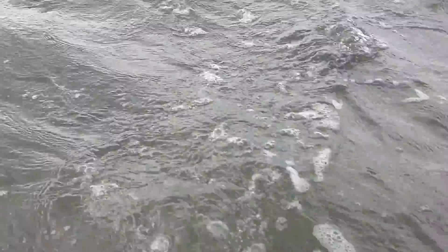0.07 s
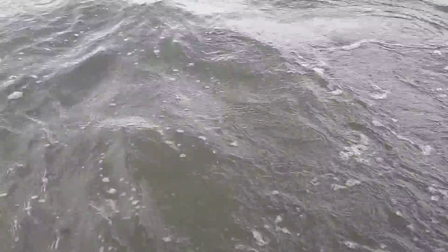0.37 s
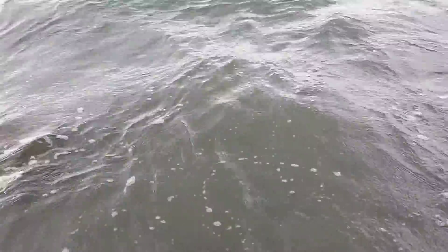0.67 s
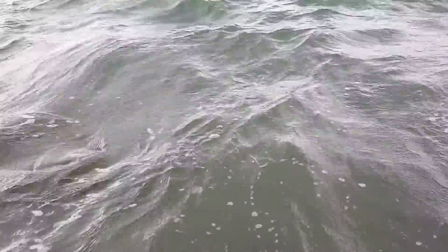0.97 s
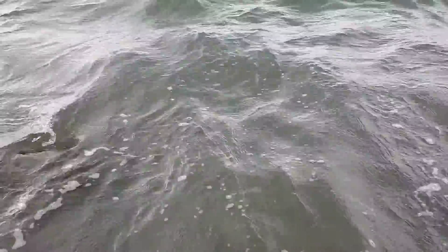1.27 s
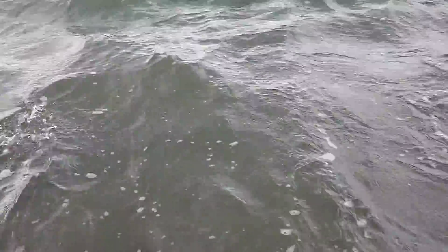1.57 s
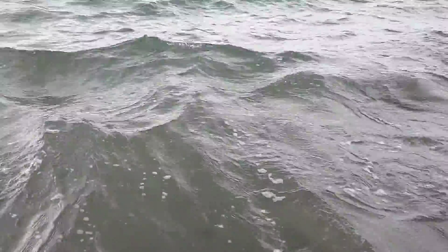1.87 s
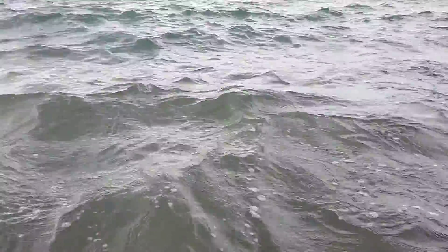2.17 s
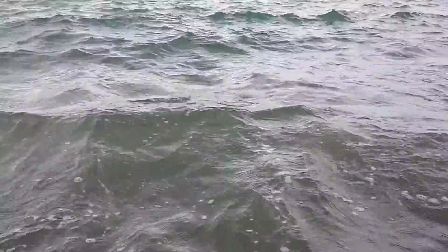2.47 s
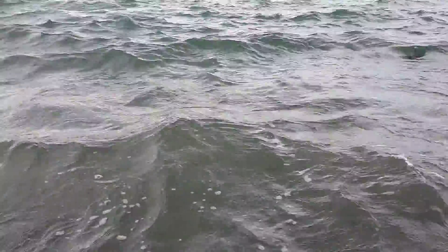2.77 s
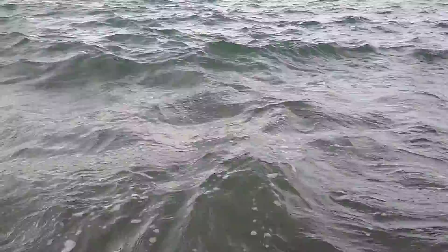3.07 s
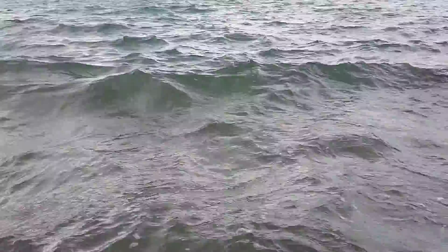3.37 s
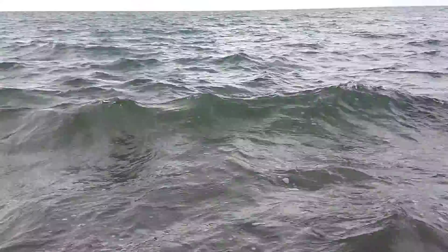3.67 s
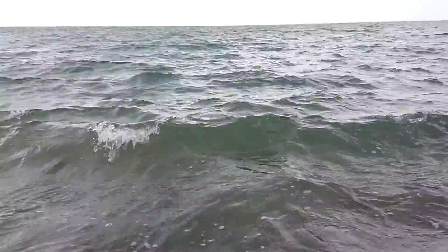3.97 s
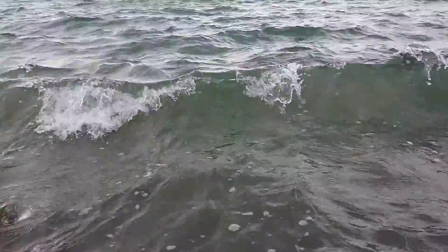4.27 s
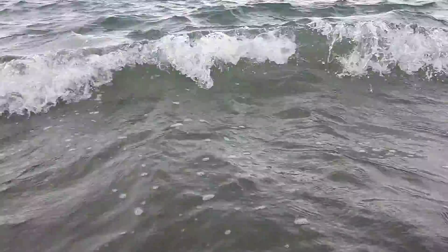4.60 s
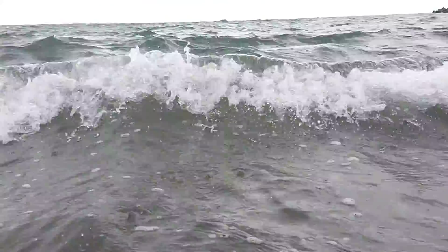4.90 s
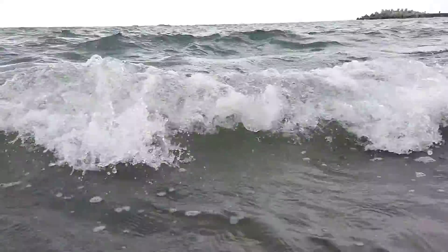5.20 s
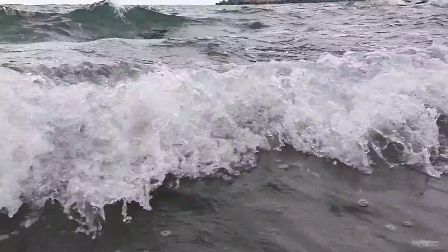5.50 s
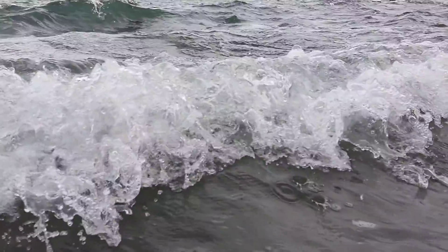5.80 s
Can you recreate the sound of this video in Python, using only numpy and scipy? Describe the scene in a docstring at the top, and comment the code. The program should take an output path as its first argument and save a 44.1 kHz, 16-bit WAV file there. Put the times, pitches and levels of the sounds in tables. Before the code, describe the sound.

Close waves wash out, ease into gentle lapping with small plops, then spill into loud foamy surf, with gusts of wind rumbling throughout.

```python
"""Shallow sea at the foot of a seawall, heard at two spaced microphone ports. First a wave washes out:
countless bubbles ring, foam hisses through a small resonant cavity at the right port, drops slap the
surface, and wind buffets each port on its own. From about 1 s the water laps and single bubbles plop.
After 4 s the next crest spills into foam, and at 5.6 s the sound stops dead in mid-break."""
import sys
import numpy as np
from scipy import signal
from scipy.fft import rfft, irfft, next_fast_len
from scipy.io import wavfile
from scipy.ndimage import uniform_filter1d

SR = 44100
rng = np.random.default_rng(int(sys.argv[2]) if len(sys.argv) > 2 else 0)


def int16_out(signal):
    """Quantize to a 16-bit WAV file."""
    q = np.round(np.clip(np.atleast_2d(signal).T, -1, 1) * 32767)
    wavfile.write(sys.argv[1], SR, q.astype(np.int16))


N = 266584

# Levels in the tables are relative: each source adds its own gain.
# agitation of the water: t/s, churning body level/dB, fine spray level/dB
SURF_LEVELS = [(0.0, -29.5, -39.5), (0.06, -35, -47), (0.09, -31.5, -41.5), (0.2, -36.5, -52),
               (0.23, -35.5, -50), (0.9, -41.5, -57.5), (1.06, -40, -56), (2.73, -44, -61),
               (3.45, -44.5, -61.5), (4.15, -41.5, -58), (4.49, -40, -51), (4.52, -36.5, -48.5),
               (4.86, -32.5, -45), (4.99, -28.5, -41), (5.0, -32, -43), (5.58, -29, -43)]
# response of each port to the water: f/Hz, level/dB
LEFT_RESPONSE = [(60, -4), (150, 3.5), (330, 5), (650, 4), (1300, -1), (1950, -5), (2500, -7),
                 (4200, -10.5), (5200, -14), (6200, -16), (8200, -26.5), (10000, -16.5), (12000, -14.5),
                 (15500, -20.5)]
RIGHT_RESPONSE = [(60, -10.5), (150, 1), (330, 5.5), (620, 7), (1300, 1), (1950, 0), (2900, -0.5),
                  (4000, -7), (5200, -25.5), (6500, -18.5), (8200, -31.5), (10000, -14.5), (11400, -9),
                  (15500, -23)]
# the cavity's mode, which shifts as the microphone is moved: t/s, centre f/Hz, bandwidth/Hz
CAVITY_MODE = [(0, 4230, 2700), (.7, 4150, 1550), (2.3, 3990, 1240), (3.75, 3800, 1010), (4.5, 4020, 1200),
               (5.0, 4330, 1360), (5.58, 4450, 1750)]
# gusts: peak t/s, decay time/s, left level/dB, right level/dB
WIND_GUSTS = [(0.06, 0.024, -20.5, -32), (0.14, 0.34, -28, -20.5), (0.29, .04, -30, -39),
              (0.91, 0.026, -48, -35), (1.04, .05, -37, -44), (1.21, .06, -35, -34),
              (1.33, 0.056, -34, -24), (1.38, 0.028, -29.5, -43), (1.575, 0.025, -33.5, -31.5),
              (1.82, 0.035, -34.5, -40), (1.979, 0.04, -26.5, -28), (2.08, 0.068, -50, -27),
              (2.23, 0.16, -41, -26.5), (2.74, 0.32, -42, -30.5), (3.09, .06, -50, -36),
              (3.28, 0.045, -54, -28), (3.63, .04, -53, -31.5), (4.21, 0.084, -53, -34.5),
              (4.615, 0.031, -21.5, -41), (5.02, 0.036, -41, -26.5), (5.1, 0.023, -41.5, -28),
              (5.44, 0.056, -28.5, -33), (5.57, 0.053, -46, -26.5)]
# spectral density of the wind's rumble: f/Hz, level/dB
RUMBLE_SPECTRUM = [(20, -30.5), (35, -13.5), (58, 3), (100, 0), (145, -6), (220, -11.5), (400, -30.5),
                   (900, -66)]
# spectral density of a hard gust's finer eddies: f/Hz, level/dB
EDDY_SPECTRUM = [(50, -12.5), (150, 4), (260, -0.5), (500, -11), (1200, -36.5), (3000, -59.5)]
# drops striking the surface: t/s, peak level/dB, centre f/Hz
DROP_IMPACTS = [(0.0074, -18, 3860), (0.0837, -14, 4830), (0.4449, -22.5, 4050), (0.9627, -22, 4200),
                (1.1832, -23, 4200), (2.4206, -23, 4430), (2.7324, -21.5, 4330), (3.104, -20.5, 3950),
                (4.5675, -17, 4040), (4.9926, -10.5, 4390), (5.23, -7, 4440)]
# lapping wavelets: peak t/s, rise in level/dB
WAVELETS = [(1.1, 0.9), (1.44, 0.7), (1.64, 1.5), (1.85, 1.1), (2.14, 0.8), (3.2, 0), (3.99, 2.5)]
# single near bubbles: t/s, level/dB, starting f/Hz
NEAR_BUBBLES = [(1.066, -25, 2790), (1.082, -28.5, 2290), (1.099, -36, 1740), (1.127, -26.5, 712),
                (1.137, -24, 3310), (1.308, -39, 1250), (1.437, -32, 3000), (1.63, -31.5, 1020),
                (1.66, -32, 1016), (1.841, -31, 2230), (2.118, -34, 1120), (2.275, -36.5, 1160),
                (3.194, -38, 776), (3.993, -34, 477), (4.988, -22, 1064)]
# fresh foam of the spilling crest: t/s, level/dB
BREAKER_FOAM = [(4.1, -40.5), (4.578, -27.5), (4.738, -30), (4.898, -24), (5.072, -25), (5.146, -29),
                (5.216, -23.5), (5.294, -24.5), (5.58, -25.5)]
# narrow notches cut from the sound: f/Hz, bandwidth/Hz
NOTCHES = [(7450, 700), (9070, 1520)]

PORT_LAG_S = 0.00038   # travel time from one port to the other
CALM_DB = -60.5   # the tabled spray level while the water only laps; surf_db is the excess over it
CHURN_SHARE_DB, SPLASH_SHARE_DB = -1.5, -6   # big and small bubbles against the whole body
FOAM_DB, FOAM_FOLLOWS = -44, 0.61   # old foam: relative level in the calm, dB gained per dB of surf
BREEZE_LEFT_DB, BREEZE_RIGHT_DB, BREEZE_WAVER_DB = -47, -41, .2 * 15
BREEZE_FOLLOWS = .2   # dB per dB of surf: breaking water pushes more air past the ports
GUST_RISE_SHARE = .45   # rise time over decay time
STOP_S, CUTOFF_HZ = 5.602, 15700


def from_db(db):
    """Amplitude ratio of a level in decibels."""
    return 10 ** (np.asarray(db) / 20)


def rms_one(x):
    """Normalisation to unit mean power."""
    return x / np.sqrt(np.mean(x ** 2) + 1e-20)


def in_time(rows):
    """Linear interpolation of each column of a time table at every sample."""
    s, *columns = np.transpose(rows)
    return [np.interp(np.arange(N) / SR, s, c) for c in columns]


def butter(x, hz, kind, order=2):
    """Butterworth filtering: a maximally flat passband."""
    return signal.sosfilt(signal.butter(order, hz, kind, fs=SR, output="sos"), x)


def shaped(x, gain_at):
    """Zero-phase filtering: the spectrum is multiplied by a function of frequency."""
    size = next_fast_len(N + 4096)
    return irfft(rfft(x, size) * gain_at(np.fft.rfftfreq(size, 1 / SR)), size)[..., :N]


def coloured(x, spectrum):
    """Spectral weighting by a table of f/Hz, level/dB, interpolated in log frequency."""
    hz, db = np.transpose(spectrum)
    return shaped(x, lambda f: from_db(np.interp(np.log(f + 1), np.log(hz), db)))


def drift(rate_hz):
    """Random modulation: low-pass noise of unit rms with its corner at rate_hz."""
    r = np.exp(-80 * np.pi * rate_hz / SR)   # one step per 40 samples
    slow = signal.lfilter([1], [1, -2 * r, r * r], rng.standard_normal(N // 40 + 2002))[2000:]
    return np.interp(np.arange(N) / 40, np.arange(len(slow)), rms_one(slow))


def far_wash():
    """Diffuse field: merged bubbles from all bearings are coherent at the ports only in the bass."""
    lags = PORT_LAG_S * np.sin(np.linspace(0, np.pi / 2, 20))
    hz = np.linspace(0, SR / 2, 400)
    coherence = np.cos(2 * np.pi * np.outer(hz, lags)).mean(axis=1) * np.exp(-hz / 9000)
    mid = shaped(rng.standard_normal(N), lambda f: np.sqrt(1 + np.interp(f, hz, coherence)))
    side = shaped(rng.standard_normal(N), lambda f: np.sqrt(1 - np.interp(f, hz, coherence)))
    return rms_one(np.array([mid + side, mid - side]))


def bubble_cloud(per_s, cycles, spread_db):
    """Damped oscillators: bubbles, each from its own bearing, ring down by 60 dB in `cycles` periods."""
    pitches, out = np.geomspace(300, 14000, 24), np.zeros((2, N))
    for hz in pitches:
        count = int(per_s * N / SR * hz / pitches.sum())   # small bubbles are the most common
        when, strength, bearing, sign = rng.random((count, 4)).T
        height = from_db(spread_db * np.minimum(-np.log(1 - strength), 4)) * np.sign(sign - .5)
        across = np.cos(np.pi * bearing)
        clicks = np.zeros((2, N))
        for port, facing in enumerate((across, -across)):
            at = (when * N + facing * PORT_LAG_S * SR / 2).astype(int) % N
            clicks[port, at] = height * (1 - 0.2 * facing)   # later and weaker at the far port
        r, w = from_db(-60 * hz / (cycles * SR)), 2 * np.pi * hz / SR
        poles = [1, -2 * r * np.cos(w), r * r]
        ringing = signal.lfilter([1, 0, -1], poles, clicks + 1e-12 * rng.standard_normal(N))
        out += np.sqrt(hz) * rms_one(ringing)
    return rms_one(out)


def surf(churn_db, splash_db, spray_db):
    """Bubble resonance rises as size falls: big bubbles churn, small ones splash, the finest fizz."""
    grain = from_db(-1.0 - .35 * (splash_db + 59.5))   # a harder break merges them into a wash
    cloud = bubble_cloud(per_s=2600, cycles=22, spread_db=6.5)
    cloud = coloured(cloud, [(300, -12.5), (1500, -5.5), (4000, -4.5)])
    left, right = (far_wash() + grain * cloud) / np.sqrt(1 + grain ** 2)
    heard = np.array([coloured(left, LEFT_RESPONSE), coloured(right, RIGHT_RESPONSE)])
    churn = shaped(heard, lambda f: 1 / (1 + (f / 1700) ** 6))
    spray = shaped(heard, lambda f: 1 - 1 / (1 + (f / 7000) ** 8))
    splash = heard - churn - spray
    spurts_db = .7 * drift(20)
    churn = rms_one(churn) * from_db(churn_db + 3.0)
    splash = rms_one(splash) * from_db(splash_db + 4.0 + spurts_db)
    spray = rms_one(spray) * from_db(spray_db + 4.0 + spurts_db)
    return churn + splash + spray


def foam_level(surf_db, breaker_db):
    """Masking: old foam follows the surf until the breaker's louder fresh foam takes over."""
    s, db = np.transpose(BREAKER_FOAM)
    fresh_db = np.interp(np.arange(N) / SR, s, db + breaker_db, left=-np.inf)
    return np.maximum(FOAM_DB + FOAM_FOLLOWS * surf_db, fresh_db)


def resonance(x, hz, width_hz, block=512):
    """Two-pole resonance whose centre and bandwidth move block by block."""
    r = np.exp(-np.pi * width_hz / SR)
    out, state = np.zeros(N), np.zeros(2)
    for i in range(0, N, block):
        zeros = np.array([1, 0, -1]) * (1 - r[i] ** 2) / 2
        poles = [1, -2 * r[i] * np.cos(2 * np.pi * hz[i] / SR), r[i] ** 2]
        out[i:i + block], state = signal.lfilter(zeros, poles, x[i:i + block] + 1e-18, zi=state)
    return out


def cavity(x):
    """Cavity resonance at the right port: one broad moving mode with steep skirts."""
    hz, width_hz = in_time(CAVITY_MODE)
    mode = resonance(resonance(x, hz, width_hz), hz, width_hz)
    return butter(butter(mode, 3100, "high", order=4), 5444, "low", order=12)


def foam(foam_db, bursts_per_s, burst_db):
    """Shot noise: bursting foam cells merge into a hiss; in a lull single bursts stand out."""
    bursts = (rng.random(N) < bursts_per_s / SR) * rng.standard_normal(N)
    grain = from_db(burst_db - 0.15 * (foam_db + 39.5))
    fizz = (rng.standard_normal(N) + grain * rms_one(bursts)) / np.sqrt(1 + grain ** 2)
    flutter_db = .7 * drift(27)
    return rms_one(cavity(fizz)) * from_db(foam_db + 5.5 + flutter_db)


def airflow(surf_db):
    """Addition of powers: a wavering breeze and fast-rising gusts give each port's wind level in dB."""
    t = np.arange(N) / SR
    power = np.array([from_db(db + BREEZE_FOLLOWS * surf_db + BREEZE_WAVER_DB * drift(8)) ** 2
                      for db in (BREEZE_LEFT_DB, BREEZE_RIGHT_DB)])
    for s, decay_s, left_db, right_db in WIND_GUSTS:
        blowing = slice(*np.searchsorted(t, [s - 2 * decay_s, s + 10 * decay_s]))
        age = (t[blowing] - s) / decay_s
        swell = np.exp(-np.where(age < 0, (age / GUST_RISE_SHARE) ** 2, age))
        power[:, blowing] += (from_db([[left_db], [right_db]]) * swell) ** 2
    return 10 * np.log10(power)


def wind(surf_db):
    """Turbulent pressure, independent at each port; harder gusts shed finer eddies."""
    ports = []
    for gust_db in airflow(surf_db):
        rumble = rms_one(coloured(rng.standard_normal(N), RUMBLE_SPECTRUM))
        rumble /= np.sqrt(uniform_filter1d(rumble ** 2, size=3500) + 0.027)   # the airflow sets the swell
        eddies = rms_one(coloured(rng.standard_normal(N), EDDY_SPECTRUM)) * from_db(2.0 * drift(21))
        eddy_share = from_db(-7.0 + 0.42 * (gust_db + 26.0))
        ports.append(from_db(gust_db + 1.06) * (rumble + eddy_share * eddies))
    return butter(np.array(ports), 29, "high", order=3)


def slaps(decay_s, width_hz, gain_db, left_db):
    """Impact noise: a drop striking the surface radiates a very short, bright burst."""
    out, t = np.zeros(N), np.arange(SR // 20) / SR
    for s, db, hz in DROP_IMPACTS:
        impact = rng.standard_normal(len(t)) * np.exp(-t / decay_s)
        burst = butter(impact, [hz - width_hz / 2, hz + width_hz / 2], "band", order=4)
        at = round(s * SR)
        out[at:at + len(t)] += from_db(db + gain_db) * burst / np.abs(burst).max()
    return out * from_db([[left_db], [0]])


def laps(half_width_s):
    """Amplitude modulation: each wavelet stirs up more bubbles, a brief parabolic rise in dB."""
    t = np.arange(N) / SR
    return sum(db * np.maximum(1 - ((t - s) / half_width_s) ** 2, 0) for s, db in WAVELETS)


def plops(cycles, rise, splash, gain_db, left_db):
    """Free oscillation: a bubble born in a splash rings, rising in pitch as it nears the surface."""
    out, t = np.zeros(N), np.arange(SR // 10) / SR
    for s, db, hz in NEAR_BUBBLES:
        age = t * hz / cycles   # 1 when the ring has fallen 60 dB
        note = np.sin(2 * np.pi * hz * t * (1 + rise * np.minimum(age, 1)))
        spatter = rms_one(butter(rng.standard_normal(len(t)), [hz / np.sqrt(2), hz * np.sqrt(2)], "band"))
        swell = (1 - np.exp(-t * hz)) ** 2   # the neck pinches off within a few cycles
        at = round(s * SR)
        out[at:at + len(t)] += (note + splash * spatter) * swell * from_db(db + gain_db - 60 * age)
    return out * from_db([[left_db], [0]])


def scene():
    """Superposition: the surf drives water, foam and moving air; near drops and bubbles add to them."""
    body_db, spray_db = in_time(SURF_LEVELS)
    surf_db, lap_db = spray_db - CALM_DB, laps(half_width_s=0.067)
    water = surf(body_db + lap_db + CHURN_SHARE_DB, body_db + lap_db + SPLASH_SHARE_DB, spray_db)
    foam_db = foam_level(surf_db, breaker_db=-0.2) + lap_db
    hiss = foam(foam_db, bursts_per_s=400, burst_db=-5) * [[0], [1]]   # right port only
    bubbles = plops(cycles=39, rise=0.06, splash=0.4, gain_db=7, left_db=-8.0)
    drops = slaps(decay_s=0.0018, width_hz=1100, gain_db=1.4, left_db=-18.0)
    return water + hiss + wind(surf_db) + drops + bubbles


def record(dry):
    """Filtering and gating: two narrow notches, the sudden stop and a steep treble cut."""
    for hz, width_hz in NOTCHES:
        dry = signal.lfilter(*signal.iirnotch(hz, hz / width_hz, fs=SR), dry)
    running = np.arange(N) / SR < STOP_S
    return signal.sosfilt(signal.ellip(12, .1, 90, CUTOFF_HZ, fs=SR, output="sos"), dry * running)


dry = scene()
out = record(dry)
int16_out(out)
```